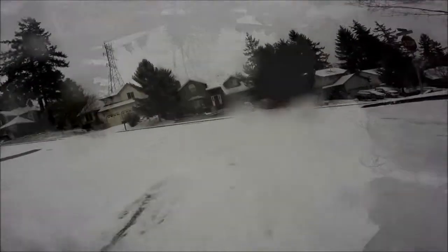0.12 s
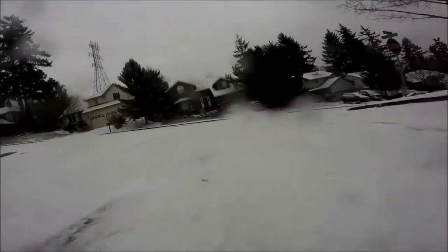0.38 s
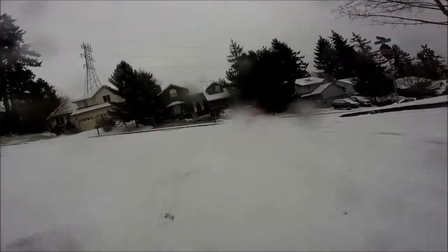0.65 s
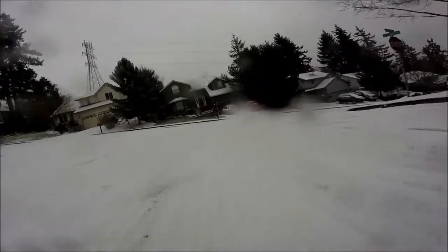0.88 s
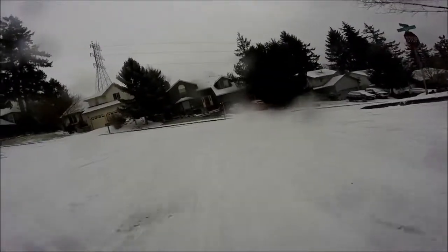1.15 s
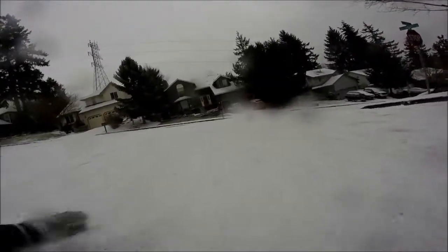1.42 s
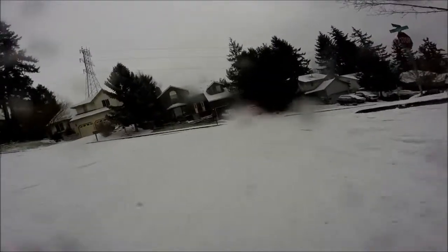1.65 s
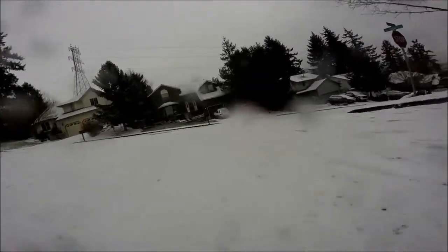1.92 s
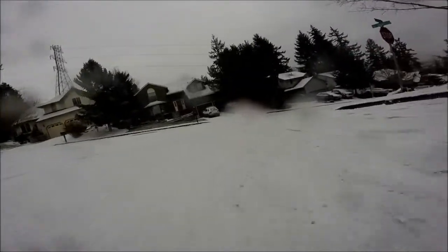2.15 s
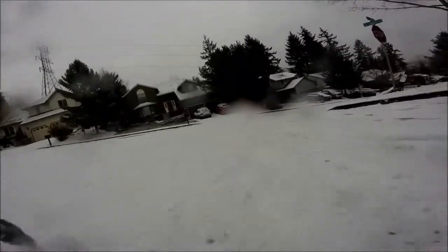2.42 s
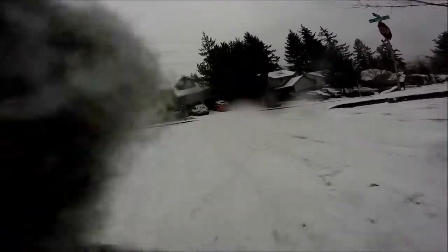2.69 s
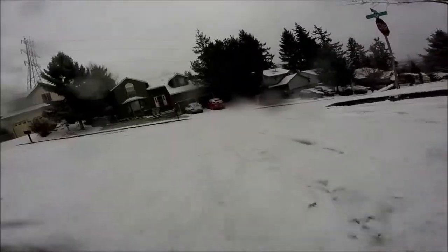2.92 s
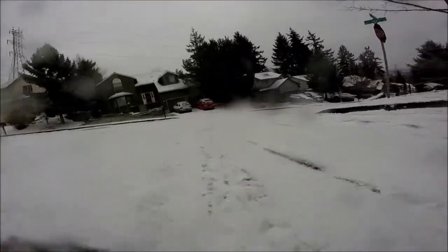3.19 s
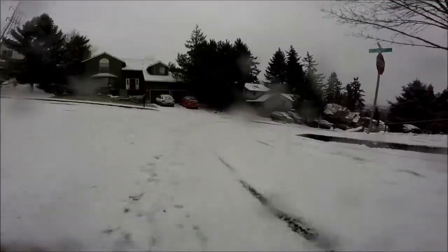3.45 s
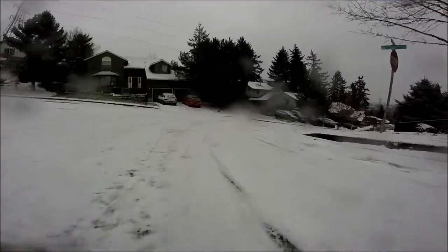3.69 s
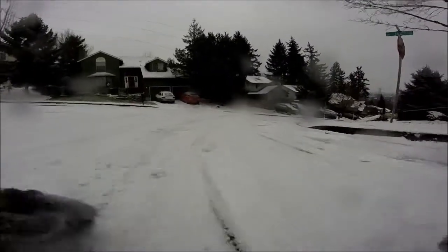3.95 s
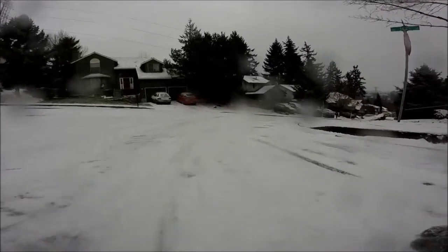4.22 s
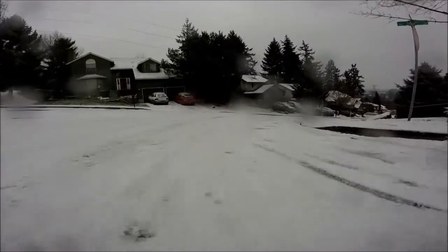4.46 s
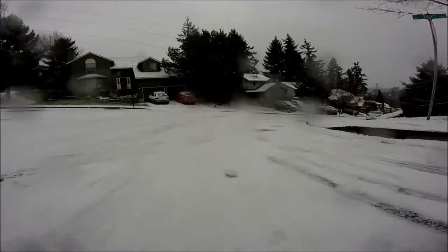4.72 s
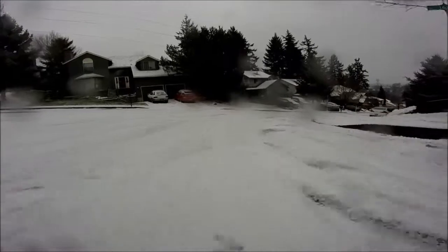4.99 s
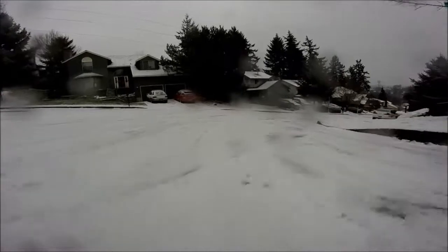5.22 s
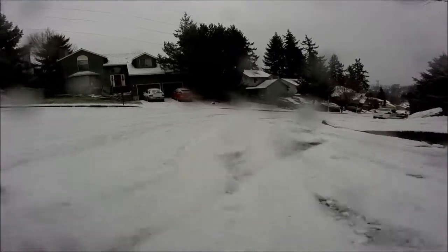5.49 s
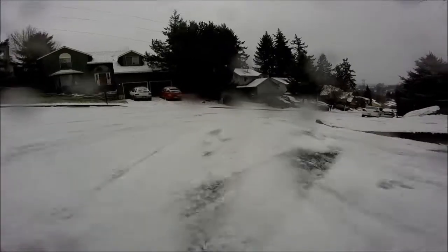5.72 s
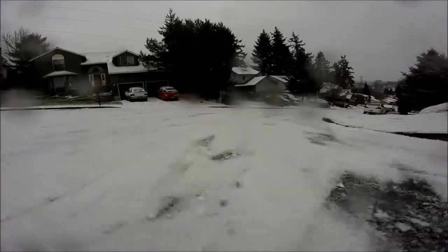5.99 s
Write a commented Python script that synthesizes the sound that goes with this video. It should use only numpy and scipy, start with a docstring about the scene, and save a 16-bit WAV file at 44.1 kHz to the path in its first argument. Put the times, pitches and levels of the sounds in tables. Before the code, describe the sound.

Very close, mono, boxy sound from a camera on a moving sled outdoors. A continuous rough scrape of snow fills everything, strongest in the midrange with little airy top, flickering as the hull digs in and skips. Low drone, rumble and dull rut knocks lie underneath, with sparse clicks and pinging ticks of thrown snow. Around the middle a shift of the rider dulls and recolours it, then grittier snow follows until the cut.

```python
"""Snow crystals break under a sled in a dense rush that rings a closed case on board.
The rush is random snaps and smooth noise, coloured by the case and split into nine bands that follow the snow.
Noise through low resonances makes the hull drone and the loaded sled rumble; fading tones thump over ruts.
Thrown snow ticks on the case as short cracks and rings, and low noise is the head wind on the microphone."""
import sys
import numpy as np
from scipy import signal
from scipy.fft import rfft, irfft, next_fast_len
from scipy.io import wavfile
from scipy.ndimage import uniform_filter1d

SR = 44100
rng = np.random.default_rng(int(sys.argv[2]) if len(sys.argv) > 2 else 0)


def to_linear_factor(level_db):
    """Convert decibel levels (scalar or array-like) to linear amplitude factors."""
    exponent = np.asarray(level_db, float) / 20
    return 10 ** exponent


def generate_wav(signal):
    """Clip the signal to [-1, 1] and save it as 16-bit WAV at the path in sys.argv[1]."""
    frames = np.transpose(np.atleast_2d(signal))
    scaled = np.clip(frames, -1, 1) * 32767
    pcm = np.round(scaled).astype(np.int16)
    wavfile.write(sys.argv[1], SR, pcm)


N = 269892

# The hull on the snow. Each row: time in seconds, weight pressing it down in dB, crustiness of the snow in dB.
CONTACT = [(0.0, 1, -1.5), (0.15, 2, -3), (0.32, 3, 0.7), (0.49, 1.7, -0.5), (0.54, -1.5, -6.5),
           (0.72, 0.6, -3.5), (0.83, 2.5, 0.7), (1.0, 0.8, 1.2), (1.2, 1, -1.2), (1.38, -1.5, -1),
           (1.47, 2.5, 2.1), (1.6, -2.5, -8.6), (1.8, 0, -2.4), (2.06, 3.5, 0.5), (2.3, 0.6, -0.5),
           (2.5, -0.5, -3.8), (2.68, 0.4, -0.9), (2.9, -0.5, 0.6), (3.1, -2, 1.2), (3.3, 3.5, -3),
           (3.56, -1.2, -5.5), (3.75, 1.3, -1.6), (4.0, 2, 2.2), (4.25, -2.5, 2.4), (4.58, -1, -0.5),
           (4.8, -2.5, 3.5), (5.05, 1.1, 3.5), (5.3, 1, 5.5), (5.55, -2, 1.7), (5.85, -0.3, 5),
           (6.12, -4.5, 0.3)]
# Unevenness of the ground. Each row: time in seconds, level of the rumble in dB before the lurches.
BUMPY = [(0.0, -34), (0.31, -39.5), (2.44, -41.5), (2.74, -37.5), (3.56, -38), (3.94, -34.5), (4.69, -39),
         (4.99, -40.5), (6.12, -47.5)]
# The loaded sled lurches (+) or glides (-). Each row: middle in seconds, dB added to the rumble.
LURCHES = [(.03, 4), (.15, 3), (.24, -2), (.33, 6), (.68, -1), (1.28, -2), (1.69, 5), (2.08, 5), (2.23, -6),
           (2.28, 6), (2.64, 8), (2.78, 6), (3.08, 6), (3.2, 6), (3.37, 7), (3.49, -6), (3.61, -1.5),
           (3.85, -1), (4.07, 9.5), (4.93, 8), (5.39, 7), (5.61, -2), (6.1, 5)]
LURCH_S = 0.023   # width of each lurch in seconds
# The rider shifts on the sled: start and end in seconds.
SHIFT_S = [3.2, 3.9]


def rms_one(x):
    """Scales a sound to an rms level of 1."""
    return x / np.sqrt(np.mean(x ** 2) + 1e-20)


def evened(x, seconds):
    """Divides out slow level changes, which leaves an rms level near 1."""
    return x / np.sqrt(uniform_filter1d(x ** 2, int(seconds * SR)) + 1e-20)


def in_time(rows):
    """Joins the rows with straight lines: one curve per column after the time."""
    s, *columns = np.transpose(rows)
    return [np.interp(np.arange(N) / SR, s, c) for c in columns]


def humps(rows, width_s):
    """Adds up a bell-shaped rise or dip for each (seconds, dB) row."""
    t = np.arange(0, N + 40, 40) / SR   # every 40th sample is enough
    bells = sum(db * np.exp(-.5 * ((t - s) / width_s) ** 2) for s, db in rows)
    return np.interp(np.arange(N) / SR, t, bells)


def drift(rate_hz):
    """Random wander, mostly slower than rate_hz, with mean 0 and spread 1."""
    r = np.exp(-80 * np.pi * rate_hz / SR)   # one step is 40 samples
    noise = rng.standard_normal(N // 40 + 2002)
    slow = signal.lfilter([1], [1, -2 * r, r * r], noise)[2000:]
    return np.interp(np.arange(N) / 40, np.arange(len(slow)), rms_one(slow - slow.mean()))


def peak(hz, width_hz, db):
    """Filter for a peak (+) or null (-) on a flat response."""
    g, c, k = to_linear_factor(db / 2), -2 * np.cos(2 * np.pi * hz / SR), np.pi * width_hz / SR
    return [1 + k * g, c, 1 - k * g], [1 + k / g, c, 1 - k / g]


def resonance(x, hz, width_hz):
    """Lets one pitch ring through, with a gain of about 1 on top."""
    r = np.exp(-np.pi * width_hz / SR)
    top = np.array([1, 0, -1]) * (1 - r * r) / 2
    return signal.lfilter(top, [1, -2 * r * np.cos(2 * np.pi * hz / SR), r * r], x + 1e-18)


def rider_shift():
    """How far the rider has shifted, from 0 to 1."""
    return np.interp(np.arange(N) / SR, SHIFT_S, [0, 1])


def case(x):
    """The closed case rings at some pitches and swallows others; this changes when the rider shifts."""
    # Resonances (+) and nulls (-). Each row: pitch in Hz, width in Hz, dB before the shift, dB after it.
    resonances = [(378, 120, -2, -4), (640, 210, -1.5, 0), (780, 61, 3, 2), (1265, 190, -1, -4.5),
                  (1705, 59, 4.5, 2.5), (1765, 174, -6.5, -5.5), (2050, 410, 11, 11.5),
                  (2317, 300, 7.5, 12), (2620, 280, 3.5, 8.5), (2977, 200, -5, -3), (3130, 200, 7, 3),
                  (3480, 180, 0.5, 0.5), (3760, 185, -11, -10), (4013, 230, 4, 5.5), (4610, 140, -4, -4.5),
                  (5090, 250, 5, 4.5), (5180, 200, -8.5, -5.5), (5850, 160, 1.5, -5), (5950, 260, -5, 4),
                  (7000, 300, 5, -3), (7380, 600, 1, 5.5), (7880, 400, 5, -1), (8320, 260, -4, -7),
                  (8670, 510, 1.5, 5), (9800, 300, -2, -5), (10700, 300, 2, -6.5), (11300, 610, 4.5, 4),
                  (12000, 400, -8, -6), (13350, 510, 6.5, 6.5), (13800, 300, 1, -7)]
    before, after = x, x
    for hz, width_hz, before_db, after_db in resonances:
        before = signal.lfilter(*peak(hz, width_hz, before_db), before)
        after = signal.lfilter(*peak(hz, width_hz, after_db), after)
    shifted = rider_shift()
    return (1 - shifted) * before + shifted * after


def part_levels():
    """Weight, crust and the rider's moves set the level in dB of each part of the scrape."""
    # Parts, low to high: hull growl, hull rasp, lower and upper case ring, edge ring, crust crunch,
    # grit, powder hiss, fine spray. Each row: base level in dB, dB per dB of weight, dB per dB of crust,
    # dB added after the shift, dB added when fully muffled.
    parts = [(-42, 0.76, 0, -1, 6), (-32.5, 0.76, 0.3, -0.16, 2), (-26.5, 1.2, -0.02, -0.4, -2.5),
             (-27, 0.93, 0.59, .95, -11), (-36, .6, 0.45, 0.56, 1.5), (-40.5, 0.42, 1.36, -0.35, -6.5),
             (-55, .05, 0.85, .1, -3.5), (-55, 0.55, .92, 1.5, 2.5), (-64.5, .3, 1.24, -1.2, 0.5)]
    # The hull digs in (+) or skips (-). Each row: middle in seconds, extra weight in dB.
    digs = [(.41, 2), (.52, -2), (1.02, 0), (1.31, 1), (1.7, 3), (1.77, -2), (1.84, 2.9), (2.18, -2.8),
            (2.22, 2.3), (2.3, -1.8), (2.39, 2), (2.58, 3.5), (2.75, 1), (2.88, 2.5), (3.01, 3), (3.07, 5),
            (3.26, -2.9), (3.8, -3), (4.11, -4.5), (4.43, -1.5), (4.57, -2.5), (4.65, -1), (4.74, -0.5),
            (5.21, -1.8), (5.31, -3), (5.59, 2.5), (5.9, 2.3)]
    # Small crusty (+) and soft (-) patches. Each row: middle in seconds, extra crust in dB.
    patches = [(.64, 2.5), (1.78, -1.5), (2.13, 2.5), (2.43, -1.4), (2.67, -5), (2.82, -2), (3.11, -3),
               (3.63, 3.5), (3.7, 3.5), (3.87, 0.5), (3.92, -1.5), (4.73, -0.7), (5.23, -3), (5.29, -2.5),
               (5.46, 1.6), (5.85, -2.5)]
    # The moving rider partly muffles the case. Each row: time in seconds, share from 0 to 1.
    muffling = [(3.1, 0), (3.3, 0.16), (3.47, 0.26), (3.52, 0.75), (3.58, 0.87), (3.62, 0.8), (3.68, 1),
                (3.73, .0), (3.83, 0.45), (3.87, 0.36), (3.92, 0.74), (3.97, 0.05)]
    # Chance wavering of the balance between upper (+) and lower (-) ring. Each row: middle in seconds, dB.
    wavers = [(.1, -2), (.25, 1.5), (.62, 1.5), (1.02, -5), (1.28, 0), (1.62, 0), (1.84, -1.5), (2.06, 1.5),
              (2.23, 2), (2.61, 0.5), (2.645, -7), (2.9, 2.5), (3.22, 4), (3.27, 2), (3.32, -2.5),
              (3.44, 0), (3.75, 5), (3.87, 3), (3.905, -2.5), (4.01, -4.5), (4.045, 0.5), (4.11, -3.5),
              (4.4, 0), (4.46, -1), (4.53, 5.5), (4.6, -2.5), (4.69, 2), (4.74, -4)]
    # Loose snow brushes the case brightly. Each row: middle in seconds, dB added to the fine spray.
    sprays = [(.17, 6), (2.59, 3), (2.72, 4), (2.755, 6), (2.86, 4), (2.9, 2), (2.94, 9), (3.28, 6),
              (3.5, 4.5)]

    weight, crust = in_time(CONTACT)
    weight = weight + humps(digs, 0.019)
    crust = crust + humps(patches, 0.022)
    shifted = rider_shift()
    muffled, = in_time(muffling)
    levels = []
    for db, per_weight, per_crust, after_db, muffled_db in parts:
        follows_snow = db + per_weight * weight + per_crust * crust
        rider_moves = after_db * shifted + muffled_db * muffled
        own_sway = 0.52 * drift(8)
        levels.append(follows_snow + rider_moves + own_sway)

    bumps, = in_time(BUMPY)
    levels[0] = levels[0] + 0.32 * (bumps - bumps.mean() + humps(LURCHES, LURCH_S))
    waver = humps(wavers, 0.01)
    levels[2] = levels[2] - waver
    levels[3] = levels[3] + waver
    spray = humps(sprays, 0.016)
    levels[-2] = levels[-2] + 0.44 * spray   # the powder hiss follows less strongly
    levels[-1] = levels[-1] + spray
    return levels


def scrape():
    """Crystals snap in clumps; growl, rasp, ring, crunch and hiss share them but follow the snow underneath."""
    # Colour inside the bands, before each is evened. Each row: pitch in Hz, level in dB.
    colour_rows = [(200, -16), (330, -18), (550, -24.5), (1000, -11), (1600, -9), (2600, -15.5),
                   (3500, -17), (4500, -35.5), (5500, -39), (8000, -42), (10000, -50), (12000, -59),
                   (14300, -60.5), (15300, -67)]
    # Borders of the nine bands, low to high, in Hz.
    edges_hz = [180, 700, 1780, 2190, 2900, 3730, 5150, 6300, 9000, 16500]
    levels = part_levels()
    clumps = to_linear_factor(2.0 * drift(25) + 1.5 * drift(90))
    born = rng.random(N) < 5000 * clumps / SR   # 5000 crystals per second, more in clumps
    sizes = to_linear_factor(1.5 * np.minimum(rng.exponential(1, N), 6))   # few are large
    snaps = born * sizes * rng.choice([-1, 1], N)
    rush = rms_one(snaps) + 0.83 * rng.standard_normal(N)   # finer grains merge into smooth noise

    size = next_fast_len(N)
    hz = np.maximum(np.fft.rfftfreq(size, 1 / SR), 1)
    colour_hz, colour_db = np.transpose(colour_rows)
    colour = to_linear_factor(np.interp(np.log(hz), np.log(colour_hz), colour_db))
    heard = rfft(case(rush), size) * colour
    below = [1 / (1 + (hz / edge) ** 40) for edge in edges_hz]   # steep borders
    out = 0
    for k, level_db in enumerate(levels):
        zone = irfft(heard * (below[k + 1] - below[k]), size)[:N]
        flicker_db = 0.69 * drift(30)
        out = out + evened(zone, 0.14) * to_linear_factor(level_db + flicker_db)
    return out


def hull():
    """The ground shakes the hull's low modes (its own pitches) without pause; ruts knock them."""
    # Modes. Each row: pitch in Hz, width in Hz before the drone widens it, level in dB within the drone.
    modes = [(115, 25, -0.5), (144, 30.7, 8), (255.3, 31, -11.5), (306, 76, -29)]
    # The loaded hull changes its tune. Each row: time in seconds, pitch in Hz, used relative to its mean.
    tune = [(0, 146), (.95, 150), (2.05, 139.9), (2.4, 149.8), (2.7, 128.1), (3.0, 144), (3.9, 126.1),
            (4.2, 150.2), (4.95, 144), (5.3, 153.8), (6.12, 146)]
    # The drone swells (+) and lulls (-) as the hull rocks. Each row: middle in seconds, dB added to the drone.
    rocks = [(.09, 6), (.24, -12), (.47, 4), (.63, 5), (.85, 6.5), (.97, 8), (1.26, -9), (1.33, 6),
             (1.45, 3.5), (1.62, -1), (1.75, -2), (1.86, 5), (2.03, 4), (2.3, -1), (2.39, 2), (2.97, 6),
             (3.14, -16), (3.2, 9.5), (3.3, -3), (3.37, 2), (3.52, -10), (3.77, 5), (3.83, -6), (3.9, 10.5),
             (4.02, 4), (4.14, 4), (4.19, -2), (4.25, 9.5), (4.37, 9), (4.48, -11), (4.54, 5), (4.67, 5),
             (4.8, -9), (4.93, 9), (5.05, 10), (5.2, 7), (5.32, 5), (5.5, 4), (5.9, 1)]
    # Thumps over ruts. Each row: start in seconds, level in dB, pitch in Hz around which the modes ring most.
    thumps = [(.072, -26, 150), (.459, -28, 300), (1.664, -24, 320), (1.679, -21, 310), (1.813, -31, 150),
              (2.567, -23, 300), (2.628, -18, 250), (3.056, -26, 250), (3.191, -31, 130), (3.49, -27, 270)]

    shake = rng.standard_normal(N) * to_linear_factor(0.5 * drift(10))
    drone = 0
    for hz, width_hz, db in modes:
        wide = 1.13 * width_hz
        drone = drone + to_linear_factor(db) * resonance(resonance(shake, hz, wide), hz, wide)
    drone = evened(drone, 0.15)
    tune_hz, = in_time(tune)
    drone = np.interp(np.cumsum(tune_hz / tune_hz.mean()), np.arange(N), drone)   # read faster or slower
    weight = in_time(CONTACT)[0]
    out = to_linear_factor(-37 + 0.21 * weight + humps(rocks, 0.03)) * drone

    t = np.arange(4000) / SR
    swell = t / 0.013 * np.exp(1 - t / 0.0066)   # a soft blow rises and dies within some 50 ms
    strengths_db = rng.normal(0, 1.8, (len(thumps), len(modes)))
    for (s, db, struck_hz), mode_db in zip(thumps, strengths_db):
        thud = 0
        for (hz, _, _), strength in zip(modes, mode_db):
            off_pitch_db = 20 * abs(np.log2(hz / struck_hz))   # 20 dB weaker per octave away
            thud = thud + to_linear_factor(strength - off_pitch_db) * np.sin(2 * np.pi * hz * t)
        start = round(s * SR)
        out[start:start + 4000] += to_linear_factor(db) * swell * thud
    return out


def rumble():
    """Uneven ground rocks the loaded sled just below the hull's drone."""
    rocking = resonance(resonance(rng.standard_normal(N), 108, 66), 108, 66)
    return to_linear_factor(in_time(BUMPY)[0] + humps(LURCHES, LURCH_S)) * evened(rocking, 0.36)


def wind():
    """Head wind makes lumpy pressure on the microphone port, below the hull's drone."""
    # Each row: time in seconds, level of the wind in dB before the lurches.
    gust_levels = [(0.0, -46), (0.08, -30), (0.27, -40), (0.31, -34.5), (0.66, -39.5), (0.68, -32.5),
                   (0.82, -41.5), (1.77, -49), (3.54, -37.5), (4.07, -30), (4.09, -38), (5.42, -41),
                   (5.52, -33), (5.71, -49), (5.79, -39), (5.98, -42), (6.05, -29), (6.12, -46)]
    band = signal.butter(2, [16, 65], "band", fs=SR, output="sos")
    gusts = signal.sosfilt(band, rng.standard_normal(N + SR))[SR:]   # the filter settles for a second
    lumpy = evened(gusts * to_linear_factor(1.2 * drift(11.0)), 0.18)
    return to_linear_factor(in_time(gust_levels)[0] + 0.41 * humps(LURCHES, LURCH_S)) * lumpy


def ticks():
    """Each lump of thrown snow hits the case with a short bright crack and a ring at a pitch of its own."""
    # Each row: start in seconds, level of the ring in dB, pitch of the ring in Hz, level of the crack in dB.
    lumps = [(.0700, -4.5, 2240, -56), (0.071, -18.5, 4120, -55), (.1715, -30, 7600, -53),
             (.413, -34, 7900, -71), (.4948, -50, 14500, -45), (1.685, -17, 2290, -78),
             (2.6868, -44, 9800, -62), (2.7167, -42, 9000, -57), (2.7494, -38, 13200, -53),
             (2.8594, -48, 9200, -63), (2.9402, -35, 10700, -51.5), (3.215, -55, 12000, -70),
             (3.3029, -45, 13500, -65), (3.599, -44, 5600, -69), (4.113, -15, 1870, -87),
             (4.222, -8, 2140, -80)]
    t, out = np.arange(1200) / SR, np.zeros(N + 1200)
    noises = rng.standard_normal((len(lumps), 1200))
    for (s, ring_db, hz, crack_db), noise in zip(lumps, noises):
        crack = np.diff(noise * np.exp(-t / .0009), 2, prepend=[0, 0])   # differences brighten it
        # up in a cycle, fades over some thirty
        swell_and_fade = (1 - np.exp(-(t * hz) ** 2)) * np.exp(-t * hz / 7.5)
        ring = np.sin(2 * np.pi * hz * t) * swell_and_fade
        start = round(s * SR)
        out[start:start + 1200] += to_linear_factor(crack_db) * crack - to_linear_factor(ring_db) * ring
    return out[:N]


def scene():
    """All the sounds of the sled ride added up, as one channel."""
    return (scrape() + hull() + rumble() + wind() + ticks())[None]


def low_pass(x):
    """Removes everything above the highest recorded frequency."""
    return signal.sosfilt(signal.butter(12, 15100, fs=SR, output="sos"), x)


def record(dry):
    """The microphone falls away steeply above 14700 Hz."""
    top = signal.sosfilt(signal.butter(8, 14700, fs=SR, output="sos"), dry)
    return low_pass(top)


dry = scene()
out = record(dry)
generate_wav(out)
```